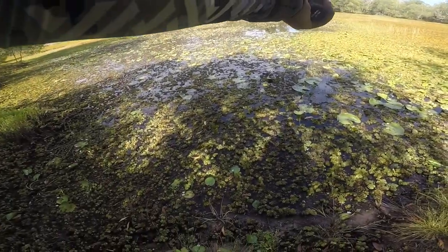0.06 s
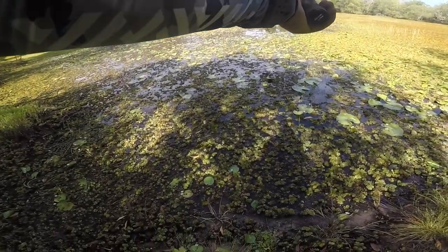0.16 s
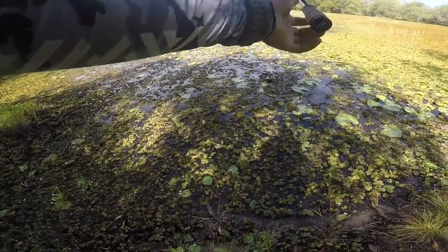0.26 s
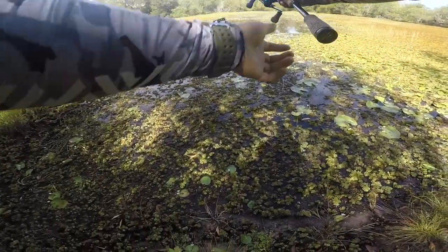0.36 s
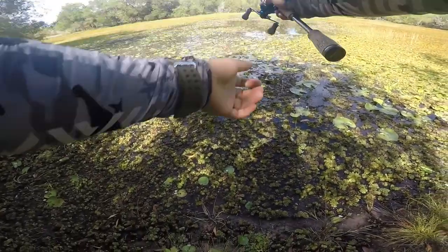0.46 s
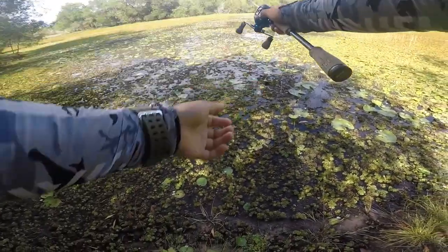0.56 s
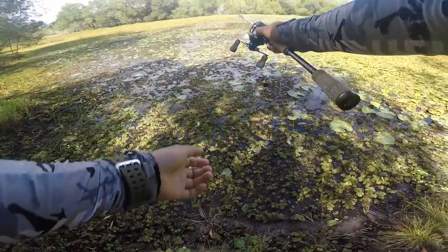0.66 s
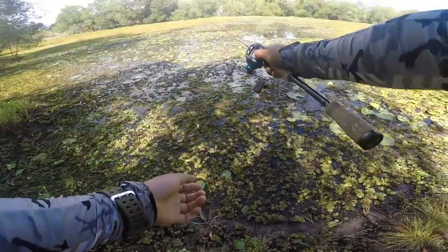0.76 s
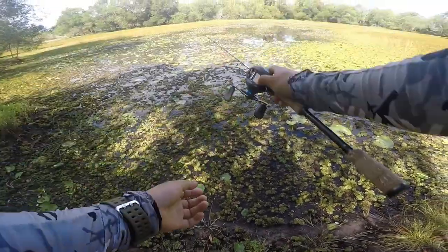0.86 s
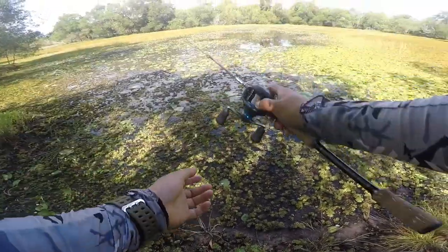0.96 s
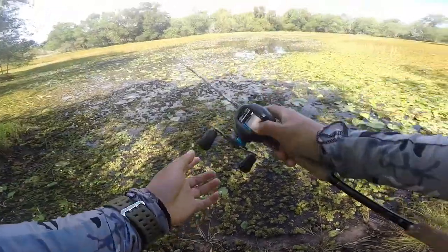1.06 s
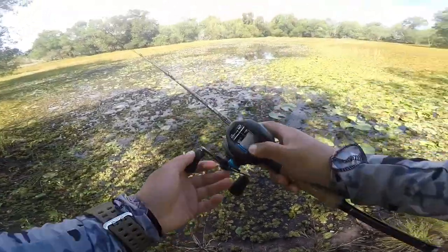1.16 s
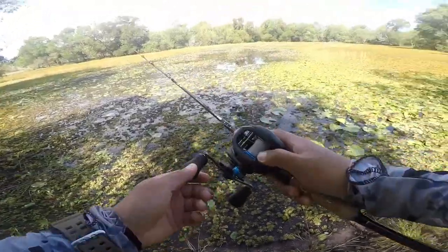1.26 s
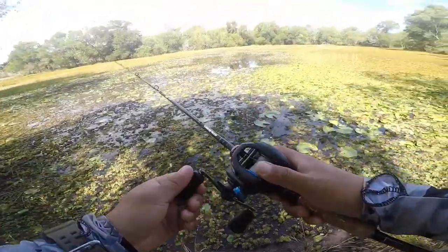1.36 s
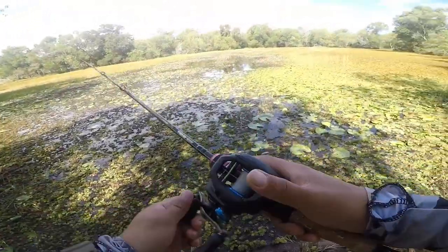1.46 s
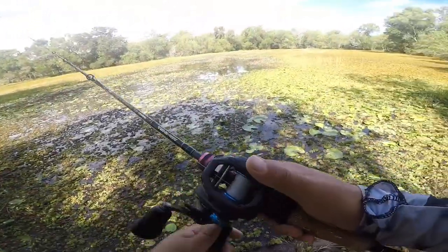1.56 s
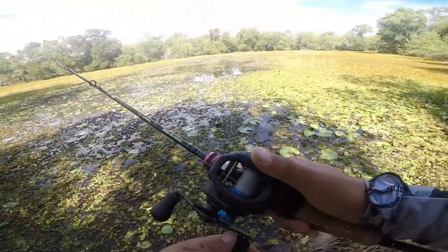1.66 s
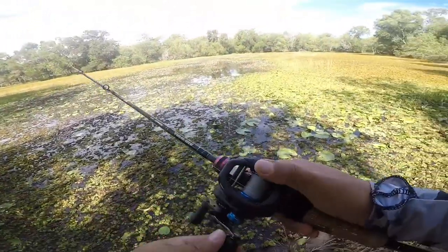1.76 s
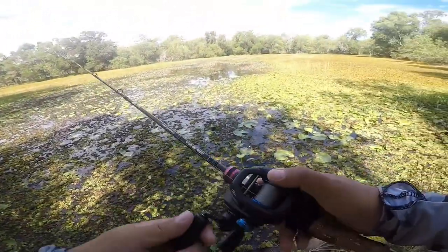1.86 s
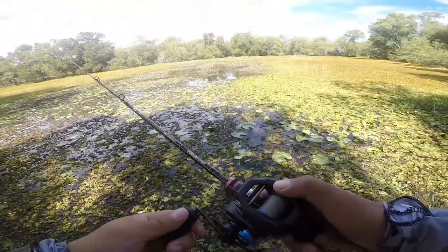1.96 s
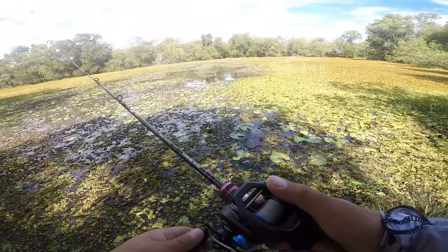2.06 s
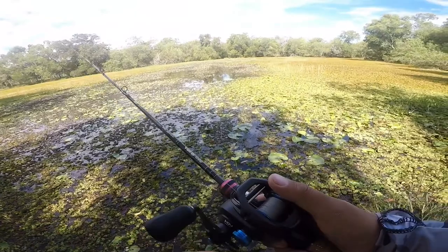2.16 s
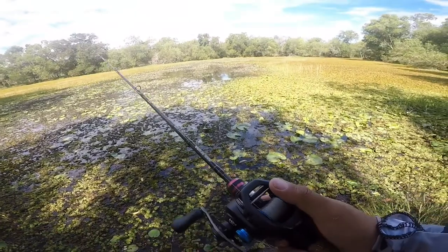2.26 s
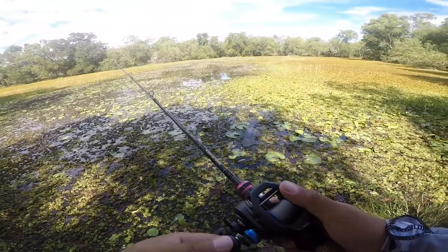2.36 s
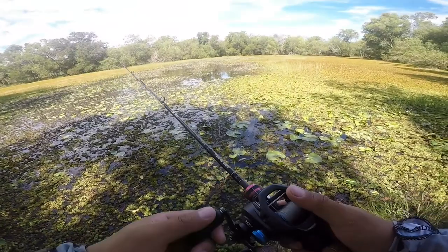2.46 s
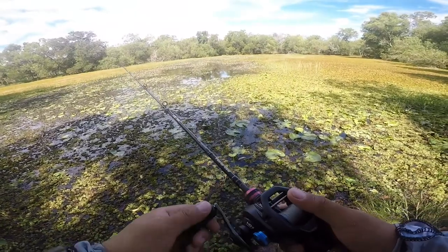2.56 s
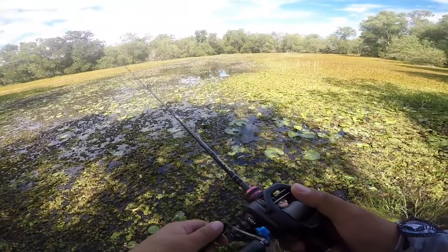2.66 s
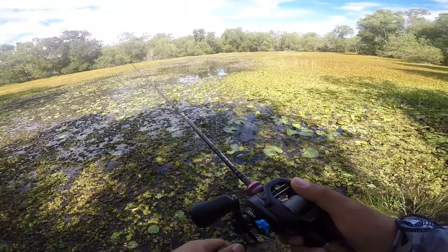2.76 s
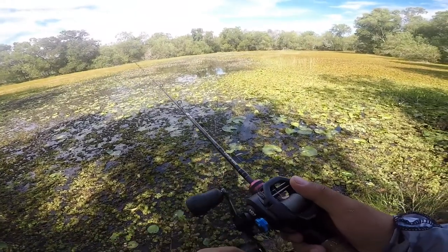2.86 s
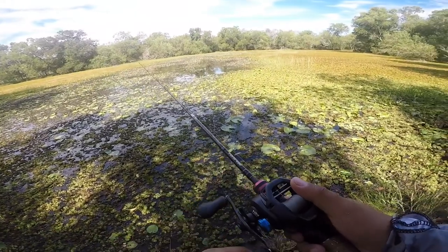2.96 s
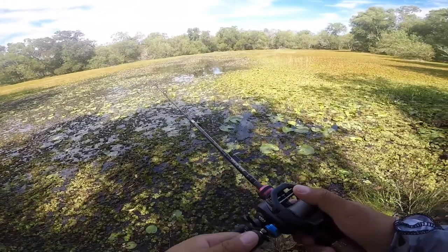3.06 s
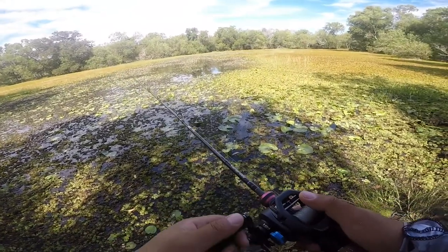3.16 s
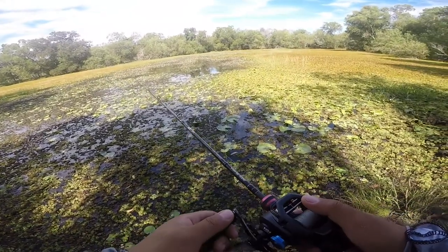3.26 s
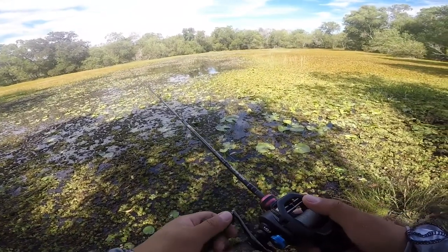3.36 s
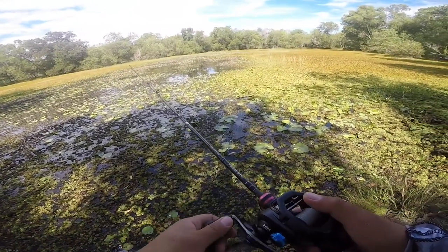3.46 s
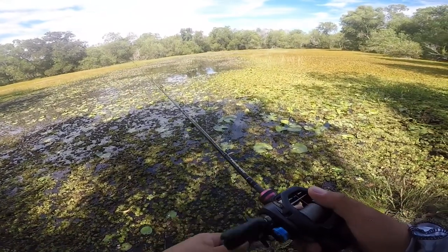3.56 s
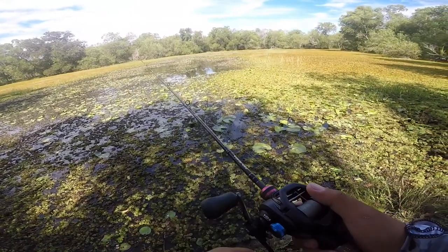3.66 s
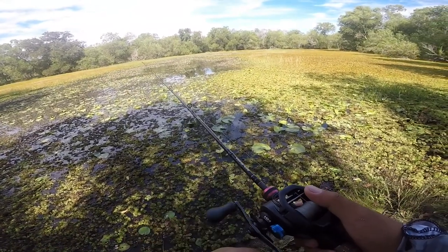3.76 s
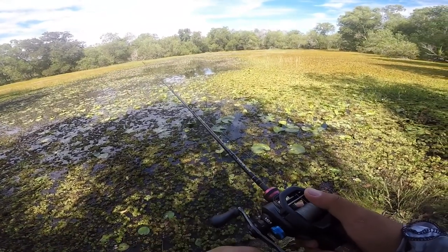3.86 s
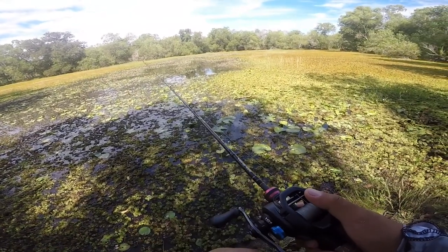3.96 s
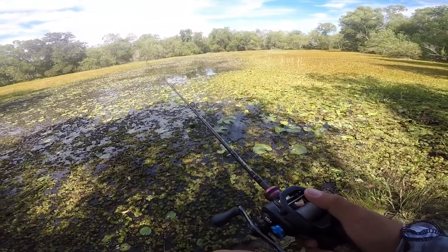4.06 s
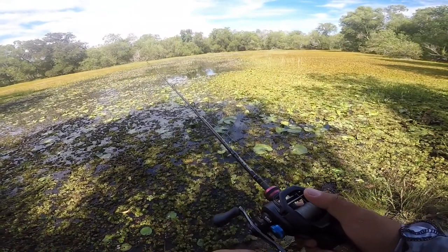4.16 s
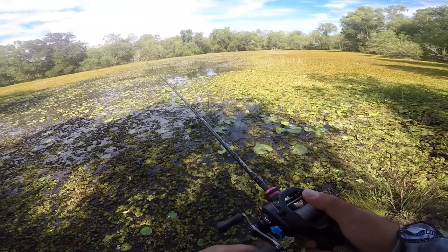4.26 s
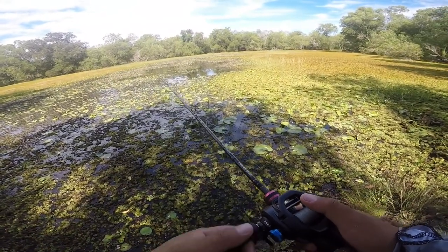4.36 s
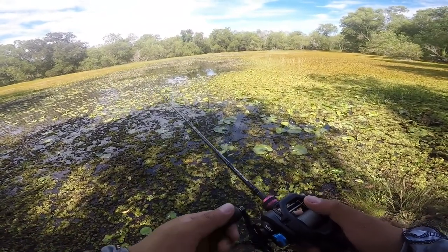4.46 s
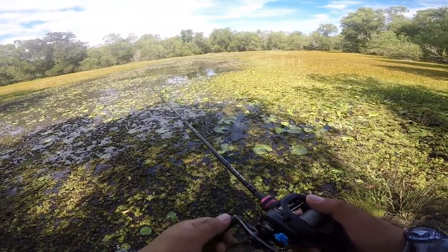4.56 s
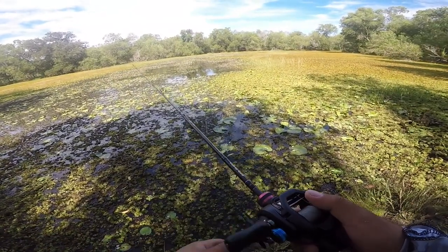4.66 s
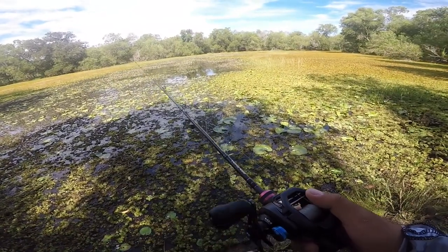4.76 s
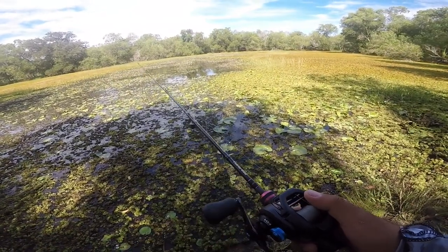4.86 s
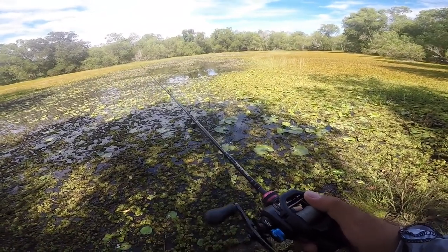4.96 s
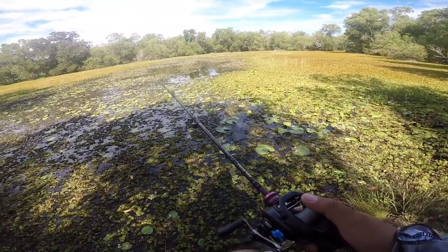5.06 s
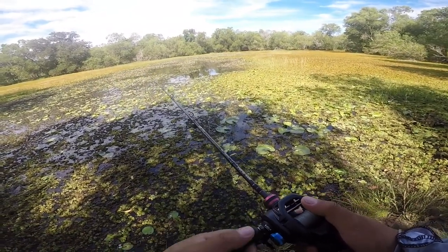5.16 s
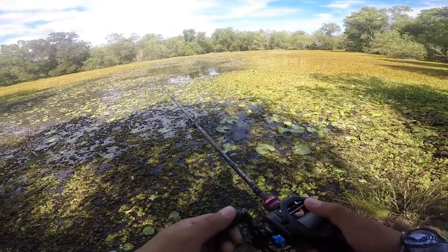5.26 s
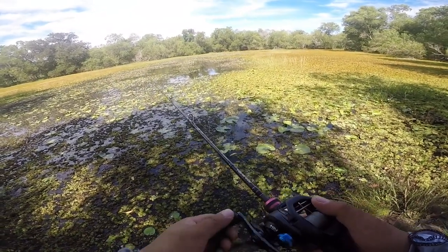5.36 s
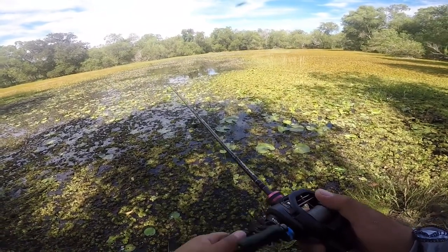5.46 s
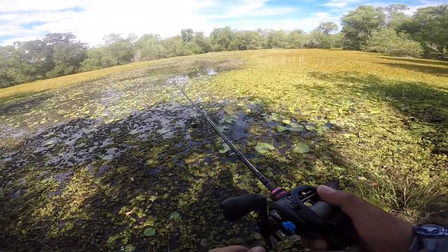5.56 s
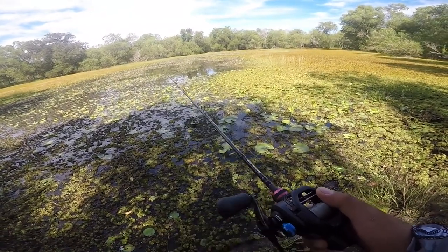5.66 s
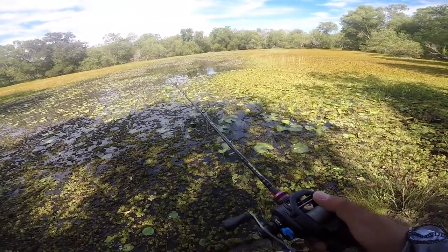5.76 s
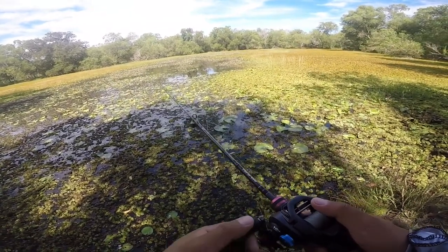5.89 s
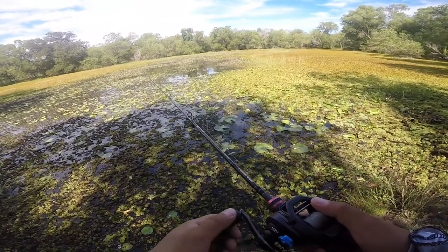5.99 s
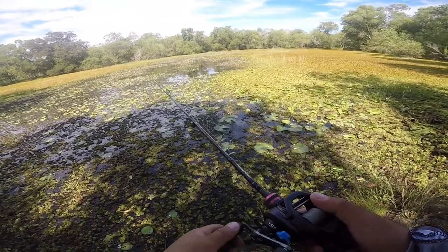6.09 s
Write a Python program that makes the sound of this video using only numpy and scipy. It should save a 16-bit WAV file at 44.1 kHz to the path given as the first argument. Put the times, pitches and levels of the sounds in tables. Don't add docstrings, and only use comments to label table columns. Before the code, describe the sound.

Loud, close handling noise comes first: sleeve strokes, squeaky strap creaks, low air rumble and boxy bumps against a small camera housing. The biggest thump is followed by a crisp, clattering reel click. Movement then settles into scattered dull knocks, and the open swamp emerges quietly behind, with high chirps and whistles, a few lower bird notes and a fine insect buzz pulsing in phrases.

```python
import sys
import numpy as np
from scipy import signal
from scipy.fft import rfft, irfft, next_fast_len
from scipy.io import wavfile
from scipy.ndimage import map_coordinates

SR = 44100
rng = np.random.default_rng(int(sys.argv[2]) if len(sys.argv) > 2 else 0)


def to_wav(s):
    ch = np.atleast_2d(s).T
    pcm = np.round(np.clip(ch, -1, 1) * 32767)
    wavfile.write(sys.argv[1], SR, pcm.astype(np.int16))


def decibels_to_gain(level_db):
    exponent = np.asarray(level_db, float) / 20
    return 10 ** exponent


N = 270333
T = np.arange(N) / SR


def unit(x):
    return x / np.sqrt(np.mean(x ** 2) + 1e-20)


def along(points, f):
    hz, value = np.transpose(points)
    return np.interp(np.log(f + 1), np.log(hz + 1), value)


def curves(rows):
    s, *columns = np.transpose(rows)
    return [np.interp(T, s, column) for column in columns]


def wobble(rate_hz):
    knots = rng.standard_normal(int(N * rate_hz / SR) + 4)
    return map_coordinates(knots, [T * rate_hz])


def filtered(x, response):
    size = next_fast_len(N + SR // 4)
    spectrum = rfft(x, size) * response(np.fft.rfftfreq(size, 1 / SR))
    return irfft(spectrum, size)[..., :N]


def add(track, s, sound):
    start = round(s * SR)
    part = track[..., start:start + sound.shape[-1]]
    part += sound[..., :part.shape[-1]]


def ringing(modes, f, order=1):
    total = 0
    for k, (center_hz, width_hz, db) in enumerate(modes):
        damping = 1j * f * width_hz
        mode = damping / (center_hz ** 2 - f ** 2 + damping)
        total = total + (-1) ** k * decibels_to_gain(db) * mode ** order
    return total


def cavity(f):
    # f/Hz, width/Hz, level/dB
    housing = [(530, 286, 1.5), (1050, 384, 2), (1423, 350, -2.5), (1853, 590, -4), (2705, 630, -14.5)]
    return ringing(housing, f, order=2)


def ports(shared, own):
    # f/Hz, phase/rad
    port_lag = [(150, 0.042), (290, 1.22), (450, 2.35), (950, 2.613), (2100, 2.75), (2600, 1.37),
                (3600, 0.12)]
    # f/Hz, share/0-1
    port_share = [(60, 0.82), (300, 0.85), (1000, 0.9), (2500, 0.54), (4000, 0.48), (7000, 0), (12000, 0.1)]

    def share(f):
        return np.clip(along(port_share, f), 0, 1)

    def shared_response(f):
        return np.sqrt(share(f)) * np.exp(.5j * along(port_lag, f) * np.array([[-1], [1]]))

    return filtered(shared[None], shared_response) + filtered(own, lambda f: np.sqrt(1 - share(f)))


def hiss(response, lumps=1):
    noise = filtered(lumps * rng.standard_normal((3, N)), response)
    return unit(ports(noise[0], noise[1:]))


def movement():
    # t/s, level/dB
    motion = [(0, -55.5), (.3, -51), (.36, -48), (.6, -47.5), (.72, -47), (.9, -46), (1.05, -46.5),
              (1.3, -45), (1.335, -53.5), (1.61, -61), (1.8, -54), (2.07, -59.5), (2.4, -57), (2.75, -60),
              (3.12, -57), (3.28, -61.5), (6.13, -60)]
    # t/s, length/s, level/dB
    strokes = [(0.019, 0.012, -50), (0.07, 0.034, -52), (0.111, 0.06, -50.5), (0.229, 0.043, -46),
               (0.307, 0.05, -42), (0.412, 0.049, -46), (0.653, .04, -51), (0.732, 0.074, -42),
               (0.845, 0.052, -46), (0.938, 0.041, -42.5), (0.984, 0.16, -46.5), (1.15, 0.094, -49.5),
               (1.194, 0.064, -41.5), (1.26, 0.031, -52), (1.621, 0.074, -52.5), (1.707, 0.077, -49),
               (2.31, 0.12, -57.5), (2.442, 0.038, -53.5), (3.04, .045, -59), (3.183, 0.07, -58)]
    edge_s, settle_s = 0.01, 1.78
    rest_db, sway_per_rub = -59.5, 0.48
    steady_db, = curves(motion)
    power = decibels_to_gain(2 * steady_db)
    for s, length_s, db in strokes:
        rise = T - s
        fall = (s + length_s - T) / 2 + edge_s
        power = power + decibels_to_gain(2 * db) * np.clip(np.minimum(rise, fall) / edge_s, 0, 1) ** 2
    rub_db = 10 * np.log10(power)
    stir = np.exp(-(T / settle_s) ** 2)
    sway_db = -49 + sway_per_rub * (rub_db - rest_db) + 2.5 * stir
    breeze_db = -77 + 21 * stir
    return rub_db, sway_db, breeze_db


def cloth():
    # f/Hz, density/dB
    fibres = [(2500, -120), (3100, 2.5), (4500, -2), (7000, -2.5), (12000, -8), (14000, -120)]
    # f/Hz, density/dB
    rumble = [(110, -70), (125, -18), (140, 1), (155, 1.5), (220, -8), (300, -9.5), (400, -20.5),
              (600, -43), (900, -120)]
    # f/Hz, density/dB
    air = [(20, -14), (60, -11), (110, -7.5), (140, -2), (200, -120)]
    rub_db, sway_db, breeze_db = movement()
    catches = decibels_to_gain(1.3 * wobble(30) + 1.6 * wobble(150) + 2.9 * wobble(600))
    heaves = decibels_to_gain(0.9 * wobble(16) + 2 * wobble(40))

    scrape = decibels_to_gain(rub_db + 9) * hiss(cavity, catches)
    fibre_hiss = decibels_to_gain(rub_db - 11.5) * hiss(lambda f: decibels_to_gain(along(fibres, f)), catches)
    buckle = decibels_to_gain(rub_db - 3.5) * hiss(lambda f: ringing([(368.0, 85, 0)], f, order=2), catches)
    buckle = buckle * decibels_to_gain([[3], [-9]])
    port_edges = [(2742, 175, 0.09), (1400, 120, 0.91)]
    reed = decibels_to_gain(rub_db - 12.5) * hiss(lambda f: ringing(port_edges, f, order=2))
    sway = decibels_to_gain(sway_db + 1.8) * hiss(lambda f: decibels_to_gain(along(rumble, f)), heaves)
    sway = sway * decibels_to_gain([[.5], [-.5]])
    breeze = decibels_to_gain(breeze_db + 7.5) * hiss(lambda f: decibels_to_gain(along(air, f)))
    return scrape + reed + fibre_hiss + buckle + sway + breeze


def creak():
    # t/s, peak/dB, f/Hz
    slips = [(.248, -36, 330), (.32, -30, 523), (.359, -26.5, 460), (.41, -37, 388), (.439, -39, 340),
             (.518, -34, 300), (.749, -34, 374), (0.761, -41, 380), (0.769, -34, 380), (.777, -36, 342),
             (0.7863, -34, 340), (0.7996, -29, 400), (0.8069, -28, 450), (0.8141, -28.5, 400),
             (0.8205, -27, 332), (0.8322, -34, 402), (0.8415, -28, 423), (0.852, -28.5, 406),
             (.86, -26, 450), (0.8675, -35, 310), (0.871, -43, 330), (.945, -33, 330), (.967, -19.5, 403),
             (1.075, -30, 330), (1.18, -35, 300), (1.187, -31, 300), (1.2094, -25.5, 300),
             (1.232, -44, 350), (1.242, -34, 350), (1.261, -33, 298), (1.288, -45, 330)]
    kicks, ticks, t = np.zeros(N), np.zeros(N), T[:2000]
    for s, db, hz in slips:
        envelope = decibels_to_gain(db + 9 - 60 * t * hz / 4.5) * (1 - np.exp(-t / .0004))
        add(kicks, s, envelope * np.sin(2 * np.pi * hz * t))
        add(ticks, s, decibels_to_gain(db) * np.ones(1))
    low_cut_kicks = filtered(kicks, lambda f: 1 / (1 + (130 / (f + 1)) ** 6))
    creaks = low_cut_kicks + filtered(ticks, cavity)
    own = np.array([np.roll(creaks, 20), np.roll(creaks, -20)])
    return ports(creaks, own) * decibels_to_gain([[2.5], [-2.5]])


def taps():
    # t/s, peak/dB, f/Hz
    contacts = [(0.031, -27.5, 690), (.086, -30, 1100), (.237, -33, 594), (0.312, -25, 2000),
                (0.36, -33, 945), (0.731, -30, 1400), (0.798, -22, 1270), (.871, -30, 1140),
                (.892, -42, 1150), (0.967, -15.5, 1120), (1.232, -30, 1900), (1.244, -27, 1050),
                (1.569, -28.5, 497), (1.755, -26.5, 450), (1.814, -35.5, 1400), (1.901, -38.5, 1660),
                (1.967, -35.5, 1850), (2.012, -23.5, 800), (2.052, -30, 1110), (2.107, -33.5, 1050),
                (2.185, -30, 556), (2.412, -25.5, 1030), (2.426, -34, 1450), (2.547, -30.5, 530),
                (2.617, -39, 690), (2.69, -35.5, 670), (2.311, -36.5, 1430), (2.363, -40.5, 1500),
                (2.877, -37, 1470), (2.937, -41, 930), (3.025, -40, 1180), (3.04, -36, 1506),
                (3.051, -39, 1400), (3.063, -38, 1650), (3.073, -35, 950), (3.099, -32.5, 1570),
                (3.126, -31.5, 530), (3.177, -30, 1200), (3.189, -40, 1200), (3.29, -37, 1250),
                (3.542, -34, 2070), (3.618, -32, 566), (4.783, -36, 580), (5.43, -34, 584),
                (5.565, -33, 600), (5.725, -38, 581), (5.802, -39.5, 1890), (5.957, -40.5, 2520),
                (6.076, -28.5, 1050)]
    knocks, blows, t = np.zeros(N), np.zeros((3, N)), T[:2000]
    for s, db, hz in contacts:
        hard_db = db + 7 * np.log2(min(hz / 1000, 1))
        rattle = decibels_to_gain(hard_db + 10.5 - 60 * t / 0.026) * rng.standard_normal((3, len(t)))
        add(blows, s, rattle)
        add(blows, s, decibels_to_gain(hard_db + 15.5) * np.ones((3, 1)))
        envelope = decibels_to_gain(db + 0.5 - 60 * t / 0.016) * (1 - np.exp(-t / 0.00059))
        add(knocks, s, envelope * np.sin(2 * np.pi * hz * t))
    rung = filtered(blows, lambda f: cavity(f) + ringing([(3800, 1300, -27)], f, order=2))
    return ports(rung[0] + knocks, rung[1:]) + decibels_to_gain(-11) * knocks


def thumps():
    # t/s, peak/dB, f/Hz
    chest_pushes = [(.075, -36, 190), (.21, -34, 200), (0.349, -22.5, 193), (0.432, -24.5, 165),
                    (.49, -31, 199), (.56, -31, 196), (.6, -33, 202), (.685, -30.5, 203), (0.774, -30, 170),
                    (0.798, -26, 144), (0.817, -28, 180), (0.861, -23, 172), (0.969, -10, 273),
                    (1.074, -22, 280), (1.204, -16, 228), (1.223, -19, 148), (1.255, -21.5, 230),
                    (1.28, -32, 159), (1.326, -37, 164), (1.368, -24, 222), (1.367, -19, 402),
                    (1.385, -31, 230), (1.394, -33.5, 213), (1.569, -22.5, 187), (1.652, -29, 255),
                    (1.751, -18.5, 206), (1.77, -22, 231), (1.841, -29, 175), (1.924, -29, 191),
                    (1.967, -29.5, 160), (2.011, -30.5, 188), (2.048, -24, 193), (2.183, -21, 159),
                    (2.366, -31.5, 223), (2.408, -30.5, 213), (2.459, -35, 159), (2.545, -22.5, 153),
                    (2.687, -28, 168), (2.713, -26.5, 147), (2.996, -41, 175), (3.077, -29, 247),
                    (3.12, -35.5, 258), (3.143, -36, 240), (3.177, -42, 190), (3.619, -26, 148),
                    (3.24, -38, 151), (3.691, -38, 159), (3.798, -32, 175), (4.1, -32, 142),
                    (4.197, -42, 159), (4.625, -35, 165), (4.843, -36.5, 161), (5.226, -36, 160),
                    (5.43, -34, 205), (5.632, -36, 165), (5.735, -35, 175), (5.915, -41, 152),
                    (6.074, -23, 151)]
    mount_lag_s = 0.0029
    pushes = np.zeros(N)
    for s, db, hz in chest_pushes:
        cycles = T[:3000] * hz
        swell = cycles ** 1.12 * np.exp(1.5 - 1.924 * cycles)
        add(pushes, s + mount_lag_s, decibels_to_gain(db + 1.5) * swell * np.sin(2 * np.pi * (cycles + rng.random())))
    low_cut = signal.cheby2(5, 25, 112, "high", fs=SR, output="sos")
    pushes = signal.sosfiltfilt(low_cut, pushes)
    own = np.array([np.roll(pushes, 40), np.roll(pushes, -40)])
    return ports(pushes, own) * decibels_to_gain([[1], [-1]])


def clutch():
    # t/s, peak/dB, length/ms, ping f/Hz
    contacts = [
        (1.3549, -17, 1.6, 3050),
        (1.3575, -27, 2.5, 1900),
        (1.3675, -18, 2, 2950),
        (1.3701, -2.5, 1, 5600),
        (1.3718, -13, .7, 6100),
        (1.3728, -17, 1.2, 3900),
        (1.3744, -11, .9, 2900),
        (1.3762, -22, 1.5, 2260),
    ]
    # f/Hz, width/Hz, level/dB
    reel_frame = [(586, 420, -11.5), (1540, 140, 3), (2210, 240, -1), (3030, 200, 2), (3900, 440, 2.5),
                  (5470, 680, 0), (7300, 1300, 4.5), (8860, 1400, 4), (12500, 2500, -13), (14700, 800, -16)]
    grit, pings, t = np.zeros((2, N)), np.zeros((2, N)), T[:3000]
    for s, db, length_ms, hz in contacts:
        u = t / (length_ms / 1000)
        noise = rng.standard_normal((2, len(t) + 2))
        shared = np.array([noise[0, :-2], noise[0, 2:]])
        opposed = noise[1, 2:] * np.array([[1], [-1]])
        fade = (np.exp(-u ** 2) + decibels_to_gain(-29 - 60 * t / 0.026)) * (1 - np.exp(-t / 0.00015))
        add(grit, s, decibels_to_gain(db + 1.0) * (.7 * shared + .3 * opposed) * fade)
        tone = np.sin(2 * np.pi * hz * t - np.array([[.6], [0]]))
        add(pings, s, decibels_to_gain(db - 1.5) * fade * np.exp(-u ** 2 / 9) * tone)

    def shade(f):
        return np.array([1 / (1 + (f / 6800) ** 6) + .12, 1 + 0 * f])

    return filtered(grit, lambda f: ringing(reel_frame, f) * shade(f)) + pings


def notes():
    # t/s, length/s, top f/Hz, peak/dB
    arches = [
        (1.869, .072, 5960, -53.5),
        (2.985, 0.072, 6200, -50),
        (3.972, .075, 5650, -50),
        (5.053, 0.056, 6230, -51),
    ]
    # t/s, top f/Hz, length/s, peak/dB
    dives = [
        (2.508, 6230, 0.036, -51),
        (3.52, 6200, .04, -50),
        (4.488, 5800, .028, -49.5),
        (5.582, 5150, .036, -54),
        (5.689, 6080, 0.047, -50),
    ]
    # t/s, length/s
    beeps = [
        (2.702, .11),
        (2.852, 0.15),
        (3.045, .04),
        (3.112, .125),
        (3.276, .135),
        (3.449, 0.15),
        (3.662, 0.13),
    ]
    # t/s, length/s, start f/Hz, end f/Hz, peak/dB
    whistles = [(.002, 0.13, 4280, 4150, -51.5), (0.12, 0.047, 4150, 3940, -45),
                (0.166, 0.11, 4070, 4020, -56), (2.128, 0.064, 4230, 4200, -50),
                (2.436, .065, 4350, 4600, -57), (3.166, 0.14, 4230, 4060, -54.5),
                (3.248, 0.047, 4060, 3900, -52), (3.89, .11, 4980, 5280, -55),
                (3.941, .05, 4730, 4800, -61), (4.021, 0.061, 5000, 4950, -53),
                (4.651, 0.14, 4320, 4060, -56.5), (4.799, 0.095, 4120, 4170, -52),
                (4.81, 0.075, 3920, 3970, -54), (5.474, 0.067, 5130, 5230, -52),
                (5.541, 0.034, 5200, 5180, -50), (5.585, .05, 5180, 5000, -59),
                (5.89, 0.044, 4190, 4180, -58)]
    # t/s, length/s, start f/Hz, end f/Hz, peak/dB
    warbles = [(.275, 0.052, 3500, 5500, -48), (.315, .04, 5440, 4570, -58), (2.46, .035, 3900, 3550, -55),
               (3.3, 0.049, 4060, 3800, -51), (3.52, .025, 4000, 3200, -54),
               (3.016, 0.033, 5300, 4530, -48.5), (.645, 0.026, 3410, 3750, -48.5),
               (2.17, 0.04, 3950, 3250, -46.5), (2.22, 0.018, 3050, 2850, -50),
               (2.488, 0.044, 3480, 3370, -48.5), (2.706, 0.015, 3240, 3950, -48),
               (2.722, 0.037, 3870, 3820, -50), (3.34, 0.022, 3700, 2856, -47),
               (3.391, 0.013, 3230, 4240, -42.5), (3.407, 0.024, 4400, 4620, -44),
               (3.478, 0.022, 3600, 3730, -44), (3.51, 0.031, 4030, 3650, -55),
               (3.905, 0.026, 3630, 3320, -48), (4.178, .065, 3510, 2520, -57),
               (4.508, 0.04, 3900, 3480, -48), (4.752, 0.022, 3600, 3545, -51),
               (4.879, 0.05, 3520, 3320, -48), (4.882, 0.033, 4175, 3580, -45),
               (4.896, 0.016, 3180, 2900, -45), (4.914, 0.039, 3600, 4120, -46),
               (4.942, 0.034, 3270, 4720, -48.5), (4.965, 0.024, 4720, 4560, -49)]
    # t/s, length/s, start f/Hz, end f/Hz, peak/dB
    coos = [
        (1.826, 0.077, 1762, 1680, -47.5),
        (2.619, 0.096, 2235, 1850, -55),
        (4.693, 0.091, 2200, 2420, -54),
        (4.92, .04, 1717, 2030, -55),
        (4.958, 0.033, 2040, 2400, -47),
        (4.99, .025, 2450, 2590, -56),
        (5.08, 0.066, 1720, 1698, -52),
        (5.143, 0.065, 1700, 1357, -49),
        (5.35, 0.034, 1770, 1690, -54),
    ]
    # t/s, length/s, start f/Hz, end f/Hz, peak/dB
    scraps = [(2.166, 0.042, 3600, 3300, -54), (2.185, 0.047, 4230, 4200, -58), (2.2, .04, 3500, 3900, -55),
              (2.39, .025, 3400, 3200, -59), (2.485, .015, 4000, 3950, -52),
              (2.735, 0.023, 4090, 4070, -54), (2.87, .03, 3300, 3000, -52), (2.915, .025, 2900, 3280, -55),
              (3.2, .03, 3200, 3050, -62), (3.445, .05, 4750, 4450, -56), (3.935, .02, 3870, 3700, -52),
              (4.043, 0.026, 3600, 3480, -51), (4.062, .015, 2910, 2600, -50),
              (4.01, 0.024, 5250, 4600, -51), (4.045, .04, 4700, 5300, -57), (4.28, .02, 3400, 3320, -57),
              (4.49, .012, 3400, 3900, -50), (4.558, .014, 5400, 4850, -46), (4.57, .022, 4860, 4480, -52),
              (4.72, 0.02, 3300, 3420, -56), (5.255, .025, 2800, 4000, -54), (5.38, .04, 3600, 3400, -56),
              (5.52, .014, 3800, 3750, -50), (5.594, 0.013, 3600, 3080, -49),
              (5.628, 0.026, 3300, 3700, -56), (5.97, 0.027, 3630, 3800, -54), (6.0, .025, 3300, 3120, -54),
              (6.022, .014, 3770, 3740, -51), (6.05, .02, 3220, 3000, -51), (6.08, .015, 3200, 3000, -48),
              (6.097, .012, 3100, 2700, -50), (6.115, 0.013, 3200, 4000, -51)]
    from_hz, to_hz, beep_hz, beep_db = 4300, 4350, 5480, -57.5

    def arch_middle(foot_hz, top_hz):
        return foot_hz + .64 * (top_hz - foot_hz)

    bent = []
    for s, length_s, hz, db in arches:
        half_s = length_s / 2
        bent.append((s, half_s, from_hz, arch_middle(from_hz, hz), hz, db))
        bent.append((s + half_s, half_s, hz, arch_middle(to_hz, hz), to_hz, db))
    for s, hz, length_s, db in dives:
        bent.append((s, length_s, hz, hz * .77, hz * .66, db))
    level = [(s, length_s, beep_hz, beep_hz, beep_db) for s, length_s in beeps]
    glides = whistles + warbles + coos + scraps + level
    return bent + [(s, length_s, a, (a + b) / 2, b, db) for s, length_s, a, b, db in glides]


def birds():
    song = np.zeros(N)
    waver = 1 + .006 * wobble(90)
    flutter_db = 1.8 * wobble(110)
    for s, length_s, start_hz, middle_hz, end_hz, db in notes():
        u = T[:int(length_s * SR)] / length_s
        span = slice(round(s * SR), round(s * SR) + len(u))
        pitch_hz = start_hz * (1 - u) * (1 - 2 * u) + 4 * middle_hz * u * (1 - u) + end_hz * u * (2 * u - 1)
        edge = np.clip(np.minimum(u, 1 - u) * length_s / .005, 0, 1)
        if start_hz != end_hz:
            pitch_hz = pitch_hz * waver[span]
            edge = edge * decibels_to_gain(flutter_db[span])
        level_db = db
        if abs(end_hz - start_hz) > 500:
            level_db = db + 2 * np.log2(np.maximum(pitch_hz / 4000, 1))
        add(song, s, decibels_to_gain(level_db) * edge * np.sin(2 * np.pi * np.cumsum(pitch_hz) / SR))
    size = SR // 4
    echo_db = 1.5 * wobble(200)[:size] - 60 * T[:size] / .22
    trees = rng.standard_normal((2, size)) * decibels_to_gain(echo_db)
    haze = signal.fftconvolve(song[None], trees / np.linalg.norm(trees[0]), axes=1)[:, :N]
    return decibels_to_gain(-5.5) * song + decibels_to_gain(-9.5) * haze


def phrasing():
    # start t/s, phrase length/s
    bouts = [
        (.017, .191),
        (2.725, .1364),
        (5.316, 0.15),
    ]
    starts_s, lengths_s = np.transpose(bouts)
    bout = np.clip(np.searchsorted(starts_s, T) - 1, 0, None)
    return ((T - starts_s[bout]) / lengths_s[bout] + 0.026) % 1


def cricket(rate_hz, hz, fall_hz, duty, rough):
    stroke = np.cumsum(rate_hz * (1 + 0.01 * wobble(9.5))) / SR % 1
    pitch_hz = hz - fall_hz * (stroke / duty - .5) + rough * hz * wobble(900)
    shape = np.sin(np.pi * np.clip(stroke / duty, 0, 1))
    return unit(shape * decibels_to_gain(1.5 * wobble(rate_hz)) * np.sin(2 * np.pi * np.cumsum(pitch_hz) / SR))


def crickets():
    # t/s, level/dB, pause depth/0-1
    buzz = [
        (0, -57.5, 0.3),
        (1.3, -62, 0),
        (2.6, -61.5, 0.1),
        (2.8, -58.5, 1),
        (4.5, -57.5, 1),
        (6.13, -58.5, 0.6),
    ]
    level_db, depth = curves(buzz)
    phrase = phrasing()
    singing = np.clip(np.minimum(phrase - .065, .935 - phrase) / .09, 0, 1)
    gate = 1 - np.clip(depth, 0, 1) * (1 - singing)
    near = decibels_to_gain(level_db) * gate * cricket(126.5, 9156, 600, .65, rough=0.0124)
    far = decibels_to_gain(-66.5) * cricket(60, 8550, 150, 0.52, rough=0.0094)
    near_pair = np.array([np.roll(near, 16), near]) * decibels_to_gain([[-4], [2]])
    far_pair = np.array([far, np.roll(far, 9)]) * decibels_to_gain([[-2], [1.5]])
    return near_pair + far_pair


def swamp():
    # f/Hz, density/dB
    swamp_color = [(180, -33), (300, -4.5), (637, -0.5), (1540, -9.5), (1760, -4.5), (2100, -11.0),
                   (3790, -10.5), (5010, -15.0), (6000, -11.5), (8050, -14), (8880, -12.0), (11400, -23.0),
                   (15000, -28.0), (15300, -120)]
    return decibels_to_gain(-52) * hiss(lambda f: decibels_to_gain(along(swamp_color, f)), decibels_to_gain(1.1 * wobble(5.72)))


def scene():
    handling = cloth() + creak() + taps() + thumps()
    handling = filtered(handling, lambda f: 1 / (1 + (f / 11000) ** 8))
    background = filtered(crickets() + swamp(), lambda f: f < 15150)
    return clutch() + handling + birds() + background


def top_cut(x):
    return signal.sosfilt(signal.butter(12, 16510, fs=SR, output="sos"), x)


def record(dry):
    mix = filtered(dry, lambda f: np.clip((16700 - f) / 600, 0, 1))
    return top_cut(mix)


dry = scene()
out = record(dry)
to_wav(out)
```